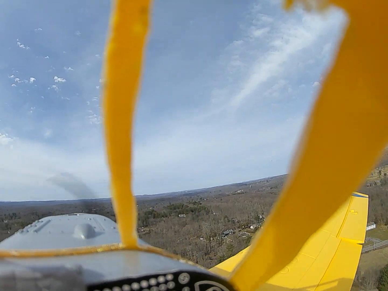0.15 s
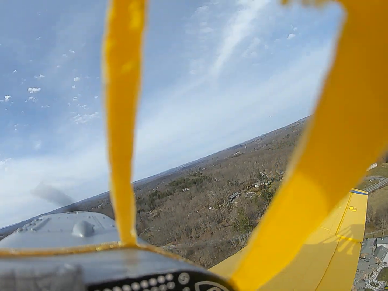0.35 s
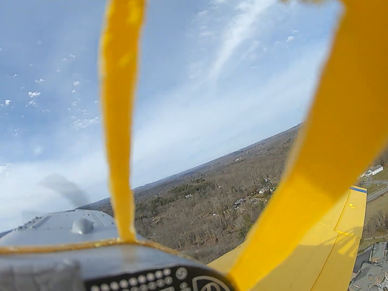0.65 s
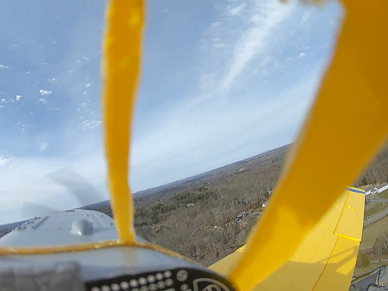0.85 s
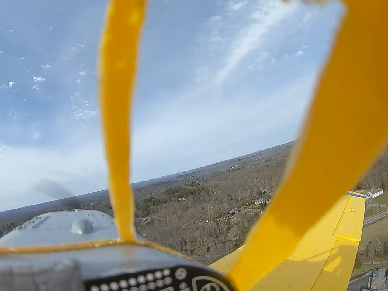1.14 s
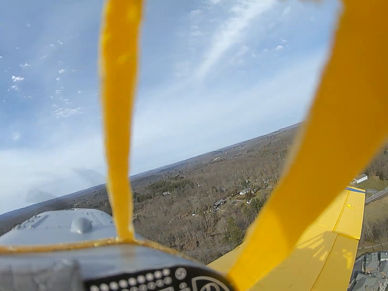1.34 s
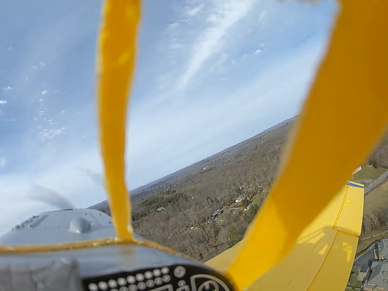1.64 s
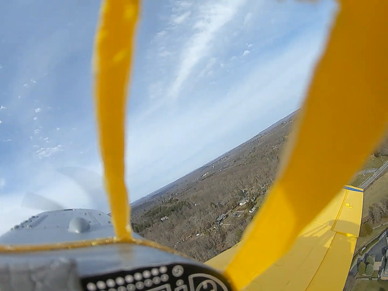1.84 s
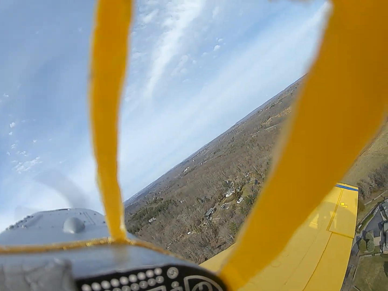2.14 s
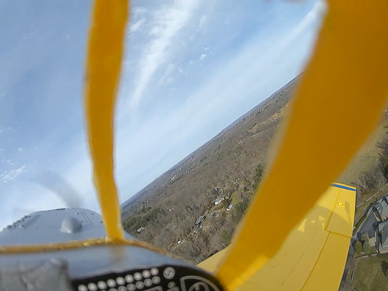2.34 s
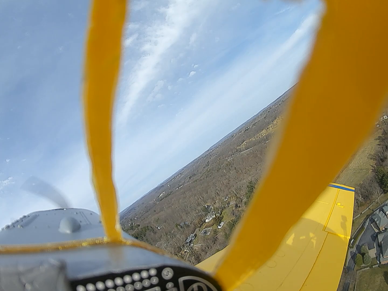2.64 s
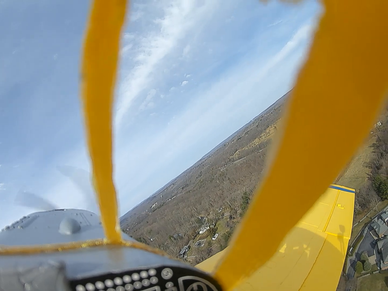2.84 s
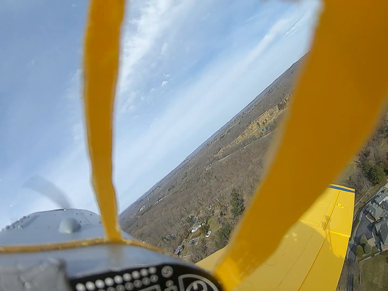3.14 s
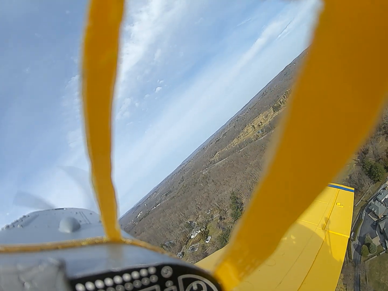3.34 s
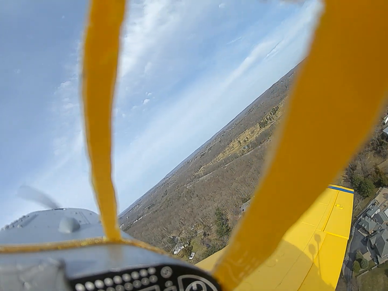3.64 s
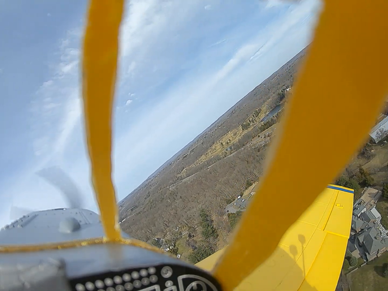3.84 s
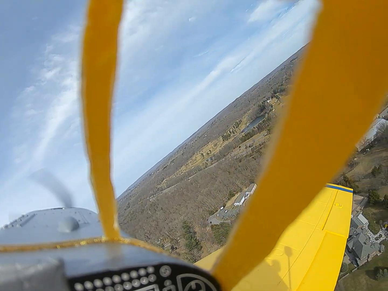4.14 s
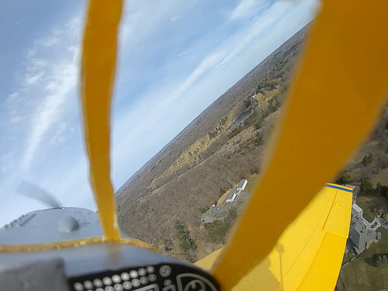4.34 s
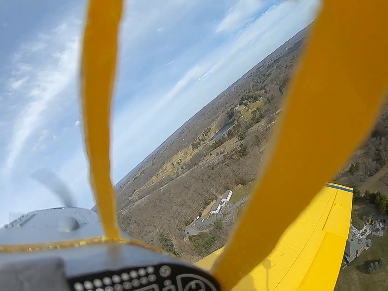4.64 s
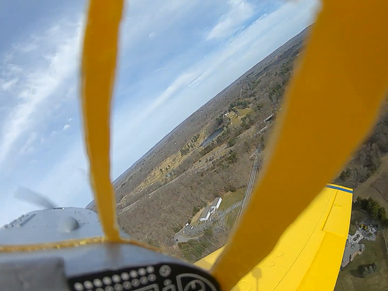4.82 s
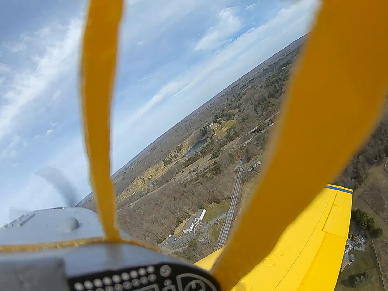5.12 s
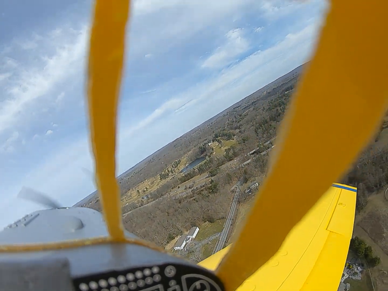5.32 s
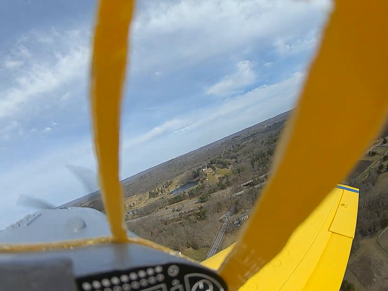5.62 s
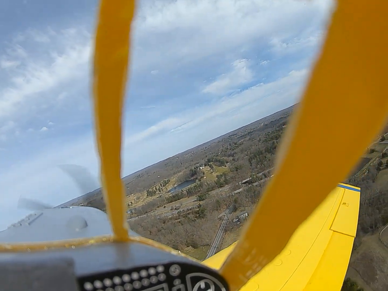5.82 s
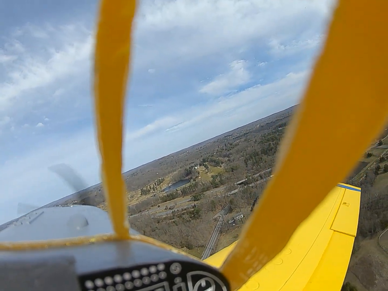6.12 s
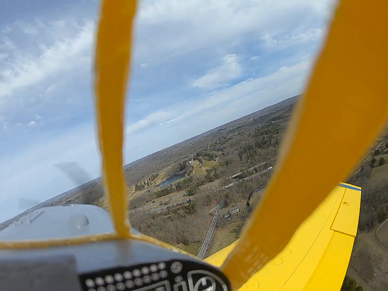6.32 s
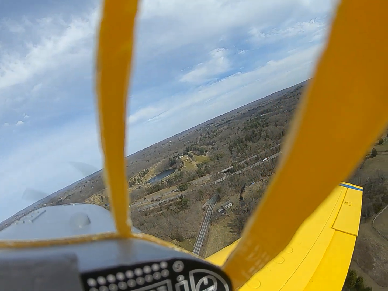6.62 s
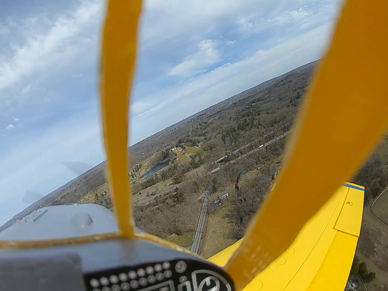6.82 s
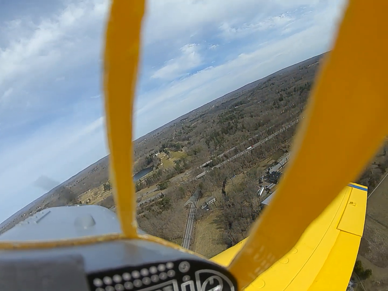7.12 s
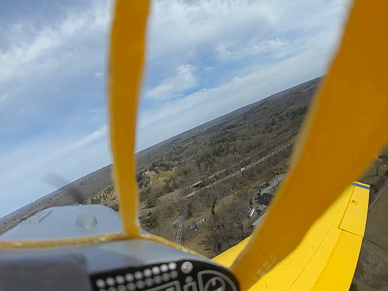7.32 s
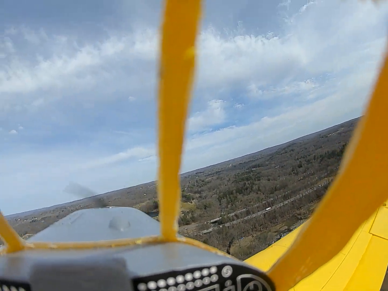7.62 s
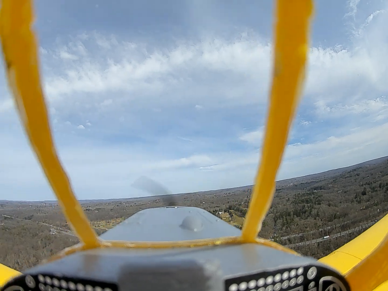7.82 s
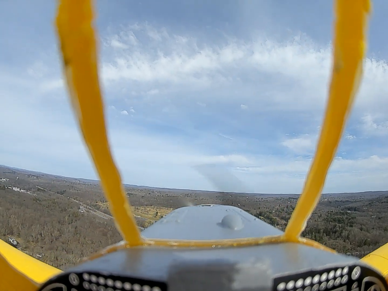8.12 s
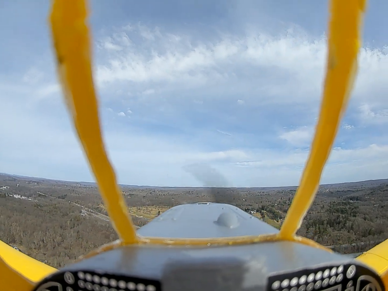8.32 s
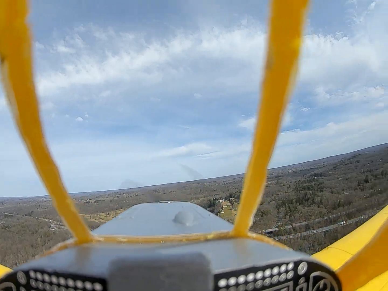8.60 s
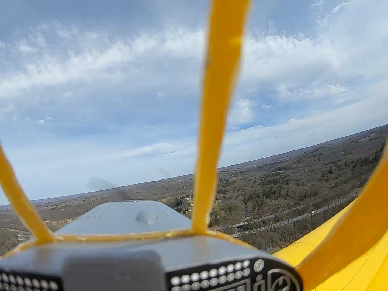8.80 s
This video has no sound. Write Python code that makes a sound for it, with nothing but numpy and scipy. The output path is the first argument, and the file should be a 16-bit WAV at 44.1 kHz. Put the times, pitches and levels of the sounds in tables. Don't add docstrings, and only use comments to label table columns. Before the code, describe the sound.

A small electric model plane in flight, heard by one microphone in its cockpit just behind the motor. From 0 to 2 seconds the propeller drones low and fast, around 180 turns a second, with a bright, raspy chatter from a loose part, briefly faltering around 0.3 to 1.5 seconds. Wind rushes over the canopy and rumbles lumpily at the microphone. From 2 seconds the pitch slides down while the low hum and buzz strengthen; by about 3.5 the rattle stops with a last couple of small knocks. From 4 to 6.5 seconds a quieter, smoother drone near 138 turns remains, with a thin high whine around 5.8 kilohertz, faint hiss, softer wind and sparse tiny ticks. At about 6.7 the motor revs up quickly, the whine rises and disappears, and from 7 to 9 seconds the strong hum and steady crisp rattle return, holding a slightly lower pitch than at first.

```python
import sys
import numpy as np
from scipy import signal
from scipy.fft import rfft, irfft, next_fast_len
from scipy.io import wavfile
from scipy.ndimage import uniform_filter1d, map_coordinates

SR = 44100
rng = np.random.default_rng(int(sys.argv[2]) if len(sys.argv) > 2 else 0)


def master(y):
    cut = np.clip(np.atleast_2d(y).T, -1, 1)
    pcm = np.round(cut * 32767)
    wavfile.write(sys.argv[1], SR, pcm.astype(np.int16))


def amplitude_ratio(level_db):
    exponent = np.asarray(level_db, float) / 20
    return 10 ** exponent


N = 395130
T = np.arange(N) / SR


def unit(x):
    return x / np.sqrt(np.mean(x ** 2) + 1e-20)


def curves(rows):
    s, *columns = np.transpose(rows)
    return [np.interp(T, s, column) for column in columns]


def law(rate, speeds, rows):
    columns = np.transpose(rows).reshape(-1, len(speeds))
    return [np.interp(rate, speeds, column) for column in columns]


def wobble(rate):
    knots = rng.standard_normal(int(N * rate / SR) + 4)
    return map_coordinates(knots, [T * rate])


def filtered(x, response):
    size = next_fast_len(N + 8192)
    hz = np.fft.rfftfreq(size, 1 / SR)
    return irfft(rfft(x, size) * response(hz), size)[:N]


def ringing(x, modes):
    def response(f):
        total = 0
        for k, (centre, width, db) in enumerate(modes):
            damping = 1j * f * width
            total = total + (-1) ** k * amplitude_ratio(db) * damping / (centre * centre - f * f + damping)
        return total
    return filtered(x, response)


def noise(spectrum, patchy_db):
    cells = signal.stft(rng.standard_normal(N + 512), nperseg=512)[2]
    field = uniform_filter1d(rng.standard_normal(cells.shape), size=5, axis=0)
    field = uniform_filter1d(field, size=10, axis=1)
    raw = signal.istft(cells * amplitude_ratio(patchy_db * unit(field)), nperseg=512)[1][:N]
    hz, db = np.transpose(spectrum)
    return unit(filtered(raw, lambda f: amplitude_ratio(np.interp(np.log(f + 1), np.log(hz), db, -120, -120))))


# time in seconds, shaft speed in turns per s.
SHAFT_SPEED = [(0, 181.5), (.6, 182.1), (1.3, 181.0), (1.95, 180.2), (2.3, 175.4), (2.9, 171.2),
               (3.2, 163.0), (3.55, 150.2), (3.84, 143.5), (4.06, 139.8), (4.5, 139.0), (4.76, 137.2),
               (5.78, 137.4), (6.645, 143.1), (6.82, 156.4), (7.27, 166.9), (8.1, 164.7), (8.96, 164.8)]


def shaft_speed():
    inertia_s = .1
    return uniform_filter1d(curves(SHAFT_SPEED)[0], size=round(inertia_s * SR), mode="nearest")


FRAME_SPEEDS = [137, 141, 150, 157, 164.5, 166.5, 172, 176, 180.3, 182]
# levels of orders 1, 2, 3 and 4 in dB.
FRAME_LEVELS = [(-40, -61, -52.5, -58), (-36.5, -58.5, -52, -59), (-32.5, -55, -56, -76),
                (-25, -59, -51.5, -62), (-21.5, -46.5, -42.5, -50), (-21.5, -66.5, -43, -52),
                (-20.5, -48, -50, -48.5), (-21.5, -43.5, -45.5, -56), (-26, -37, -49, -54),
                (-25, -35, -52, -55.5)]
# time in seconds, lift of orders 3 and 4 in dB.
BLADE_LOAD = [(0, 0), (.85, -1), (1, -4.5), (1.7, -3.5), (2, -2.5), (2.8, -2.5), (3.1, -3), (3.6, -3.5),
              (4.4, -3), (4.8, 2), (5.4, 5), (5.6, -5), (6.7, 0), (7.1, 2.5), (8.96, -2)]
# shaft order, rms at full shake in dB, share of the shake's fall it follows.
UPPER_SHAKE = [(5, -59, 0.18), (6, -57.5, 0.63), (13, -66, .8)]


def airframe_shake(turns, rate):
    levels = law(rate, FRAME_SPEEDS, FRAME_LEVELS)
    blade_db = curves(BLADE_LOAD)[0]
    shake = np.zeros(N)
    for k, db in enumerate(levels):
        level = amplitude_ratio(db + (k > 1) * blade_db + (0.47 + .5 * k) * wobble(14))
        shake += level * np.cos(2 * np.pi * (k + 1) * turns + 2.4 * k)
    fall_db = levels[0] + 23.5
    for order, db, share in UPPER_SHAKE:
        level = amplitude_ratio(db + share * fall_db + 1.7 * wobble(3.01))
        shake += level * np.cos(2 * np.pi * round(order) * turns)
    return np.sqrt(2) * shake


def contacts(turns, angle, jitter_s, scatter_db, burst_s, rough):
    count = np.arange(1, int(turns[-1]))
    chance = rng.standard_normal((len(count), 2))
    due = np.interp(count + angle - 1, turns, T)
    at = (due + np.interp(due, T, jitter_s) * chance[:, 0]) * SR
    taps = np.floor(at)[:, None] + np.arange(-7, 9)
    offset = taps - at[:, None]
    blow = np.sinc(offset) * np.cos(np.pi * offset / 16) ** 2
    size = amplitude_ratio(scatter_db * chance[:, 1:])
    train = np.bincount(np.clip(taps, 0, N - 1).astype(int).ravel(), (size * blow).ravel(), N)
    fading = signal.lfilter([1], [1, -np.exp(-1 / (burst_s * SR))], np.abs(train))
    scrape = fading * np.sign(rng.standard_normal(N))
    share = np.clip(rough, 0, 1)
    return np.sqrt(1 - share) * unit(train) + np.sqrt(share) * unit(scrape)


# time in seconds, length in seconds, loss in dB.
MISSED_LANDINGS = [(.268, .008, 9), (.31, .03, 3.5), (.432, .008, 11), (0.495, 0.039, 7.5),
                   (0.852, .008, 8), (.897, .007, 8), (.961, 0.011, 20), (1.06, .05, 3), (1.154, .015, 6),
                   (1.227, 0.011, 17), (1.288, 0.019, 20), (1.252, 0.15, 3.5), (1.503, 0.019, 6)]


def missed_landings():
    return sum(db * np.exp(-((T - s) / length) ** 2) for s, length, db in MISSED_LANDINGS)


CHATTER_SPEEDS = [149, 151.5, 153.5, 156.5, 159.5, 162.5, 164.8, 166.5, 175, 179.5, 182]
# landing knock in dB, high rebound tick and low rebound thud in dB relative to it.
CHATTER_LEVELS = [(-90, -10, 3), (-73, -12, 5), (-54.5, -16, -2), (-51, -19, -7), (-46.5, -11, -7),
                  (-46, -9.5, 0), (-47.5, -6.5, -1.5), (-45.5, -7.5, -3.5), (-46, -5, -2), (-50, -10, -5),
                  (-49, -9.5, -1.5)]
# shaft speed in turns per s, play in microseconds.
LANDING_PLAY = [(162, 20), (164.5, 38), (175, 38), (180, 68)]
# centre in Hz, width in Hz, level in dB.
KNOCK_MODES = [(2540, 670, -11), (3216, 360, -4.5), (3800, 510, -0.5), (4500, 1290, -4), (6156, 584, 3),
               (7920, 1320, -10), (9980, 1600, -14.5)]
# centre in Hz, width in Hz, level in dB.
TICK_MODES = [(9700, 3700, 1.5), (11100, 1100, -18), (12900, 1000, -7), (15600, 600, -9), (14700, 880, -3)]
# centre in Hz, width in Hz, level in dB.
THUD_MODES = [(3200, 1800, 25), (6800, 300, -4)]


def chatter(turns, rate):
    stick_s = .012
    stuck_rate = np.interp(T - stick_s, T, rate)
    knock_db, tick_db, thud_db = law(stuck_rate, CHATTER_SPEEDS, CHATTER_LEVELS)
    miss_db = missed_landings()
    play_s = np.interp(rate, *np.transpose(LANDING_PLAY)) / 1e6
    drifting = turns + rate * play_s * wobble(35)

    landing = contacts(drifting, .2, .45 * play_s, scatter_db=.8, burst_s=.0004, rough=.05)
    knock = amplitude_ratio(0.56 * wobble(22)) * unit(ringing(landing, KNOCK_MODES))
    soft = filtered(knock, lambda hz: 1 / (1 + (hz / 4550) ** 8))
    knock = amplitude_ratio(-miss_db) * (knock - soft) + amplitude_ratio(-0.42 * miss_db) * soft

    rebound = contacts(drifting, .76, play_s, scatter_db=1.2, burst_s=.0004, rough=.1)
    thud = unit(filtered(ringing(rebound, THUD_MODES), lambda hz: 1 / (1 + 1j * hz / 5000) ** 2))
    second = contacts(turns, 0.94, 6 * play_s, scatter_db=2.2, burst_s=.0007, rough=0.65)
    tick = unit(ringing(second, TICK_MODES))
    fizz = unit(ringing(rng.standard_normal(N), TICK_MODES))
    sizzle = unit(ringing(rng.standard_normal(N), KNOCK_MODES))

    mix = amplitude_ratio(1.2) * knock
    mix += amplitude_ratio(thud_db - 10.0 - .05 * miss_db) * thud
    mix += amplitude_ratio(tick_db - 2.5 - .6 * miss_db) * (tick + amplitude_ratio(-6.0) * fizz)
    mix += amplitude_ratio(tick_db - 3.5 - 0.41 * miss_db) * sizzle
    return amplitude_ratio(knock_db) * mix


# time in seconds, peak in dB.
LONE_TICKS = [(4.0821, -64), (4.7581, -63), (4.8459, -63), (4.9187, -64), (5.006, -58), (5.0499, -65),
              (5.0789, -63), (5.7793, -61)]
# time in seconds, level in dB.
SETTLING_KNOCKS = [
    (3.539, -55),
    (3.552, -51),
]


def stray_touches():
    ticks, knocks = np.zeros(N), np.zeros(N)
    for s, db in LONE_TICKS:
        ticks[round(s * SR)] = amplitude_ratio(db + 17)
    for s, db in SETTLING_KNOCKS:
        knocks[round(s * SR)] = amplitude_ratio(db + 25)
    return ringing(ticks, TICK_MODES) + ringing(knocks, KNOCK_MODES)


def sing(turns, orders):
    voice = np.zeros(N)
    for order, db in orders:
        level = amplitude_ratio(db + 0.62 * wobble(13) + 0.87 * wobble(5.0))
        voice += level * np.sin(2 * np.pi * round(order) * turns)
    return voice


# shaft order, relative level in dB.
MAGNET_PULL = [(42, 0), (84, -30)]
# shaft speed in turns per s, whine level in dB.
WHINE_LEVEL = [(137, -58.5), (139.3, -62), (141, -65), (147, -69), (153, -71), (157, -88)]
# shaft order, rms in dB.
UNEVEN_MAGNETS = [(40, -74), (41, -70), (43, -69), (44, -79), (46, -89)]
# centre in Hz, width in Hz, level in dB.
BELL_MODES = [(6100, 380, 2.5)]
# shaft order, rms in dB.
POLE_PAIRS = [(7, -68), (14, -82), (21, -92), (28, -76.5), (35, -73.5)]
# time in seconds, level in dB.
MOTOR_LOAD = [(0, 0), (3.4, 0), (3.6, -8), (4.6, -4), (6.7, -2), (6.77, 6), (7, 0), (8.96, 0)]


def motor(turns, rate):
    whine = amplitude_ratio(np.interp(rate, *np.transpose(WHINE_LEVEL))) * sing(turns, MAGNET_PULL)
    bell = ringing(sing(turns, UNEVEN_MAGNETS), BELL_MODES)
    loaded = amplitude_ratio(curves(MOTOR_LOAD)[0]) * (bell + sing(turns, POLE_PAIRS))
    return np.sqrt(2) * (whine + loaded)


# controller tone in Hz, rms in dB.
SWITCHING_TONE = [(11698, -88.5)]


def speed_controller():
    full_on_s = 6.71
    tone = sum(amplitude_ratio(db) * np.sin(2 * np.pi * hz * T) for hz, db in SWITCHING_TONE)
    return np.sqrt(2) * (T < full_on_s) * tone


# time in seconds, buffet level in dB.
AIRSPEED = [(0, -45), (1.9, -44), (2.9, -45), (3.4, -46.5), (4.3, -48.5), (5.7, -50), (6.8, -49),
            (7.5, -48), (8.96, -48.5)]
# frequency in Hz, buffet density in dB per Hz.
BUFFET_SPECTRUM = [(15, -12), (30, -6), (65, -1), (120, 2), (250, -3), (450, -5.5), (650, -14.5),
                   (1200, -12)]


def port_buffet():
    level = amplitude_ratio(curves(AIRSPEED)[0] + 7 + 0.9 * wobble(12))
    return level * noise(BUFFET_SPECTRUM, patchy_db=-0.45)


# frequency in Hz, rush density in dB per Hz.
RUSH_SPECTRUM = [(300, -8), (600, -3), (900, -7), (1350, 3), (1700, -2), (2200, -11.5), (2800, -21),
                 (4000, -24.5), (6500, -32), (16000, -68)]


def canopy_rush(rate):
    air_db = curves(AIRSPEED)[0]
    wash_db = 0.1613 * (rate - rate.min())
    rush_db = -49 + 0.35 * (air_db - air_db.min()) + wash_db
    return amplitude_ratio(rush_db + 0.25 * wobble(7.6)) * noise(RUSH_SPECTRUM, patchy_db=0.54)


# centre in Hz, width in Hz, level in dB.
CASE_MODES = [(3770, 1800, -13), (6030, 690, 3.5), (7940, 500, -3), (9400, 1150, -7.5), (13500, 360, -8),
              (14900, 800, -10)]


def case_hiss():
    return amplitude_ratio(-69.5 + .5 * wobble(40)) * unit(ringing(rng.standard_normal(N), CASE_MODES))


def scene():
    rate = shaft_speed()
    turns = np.cumsum(rate * (1 + 0.00061 * wobble(25))) / SR
    mix = airframe_shake(turns, rate) + chatter(turns, rate) + stray_touches()
    mix += motor(turns, rate) + speed_controller()
    mix += port_buffet() + canopy_rush(rate) + case_hiss()
    return mix[None]


def band_limit(x):
    return signal.sosfilt(signal.butter(12, 16950, fs=SR, output="sos"), x)


def record(dry):
    top_hz = 15820
    mix = filtered(dry[0], lambda hz: hz < top_hz)[None]
    return band_limit(mix)


dry = scene()
out = record(dry)
master(out)
```